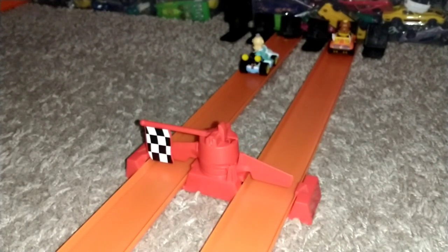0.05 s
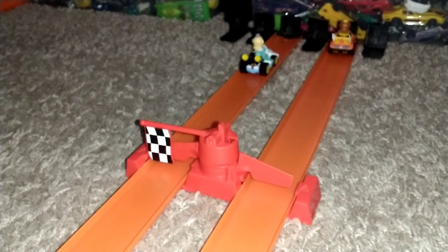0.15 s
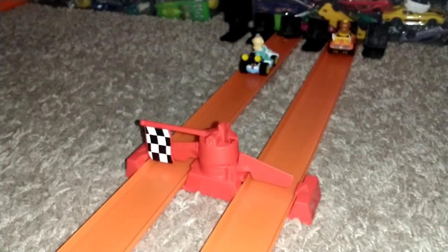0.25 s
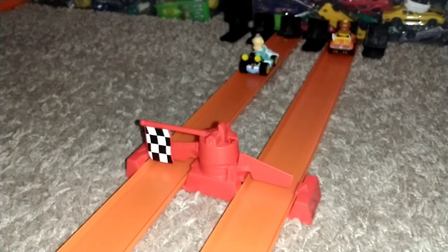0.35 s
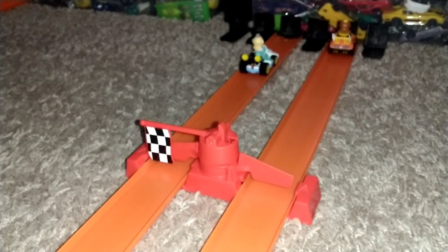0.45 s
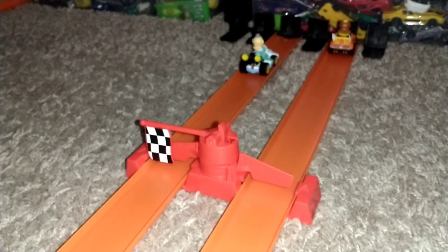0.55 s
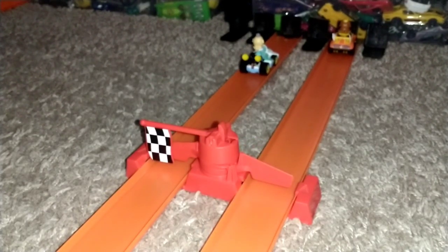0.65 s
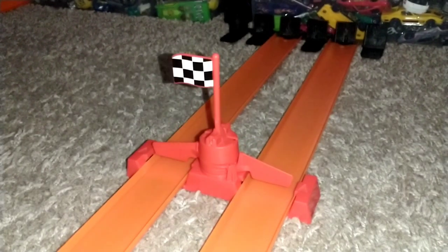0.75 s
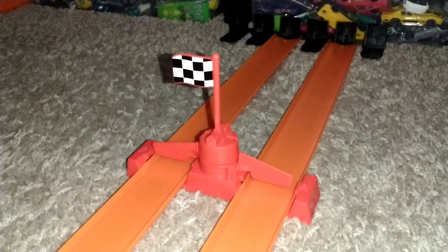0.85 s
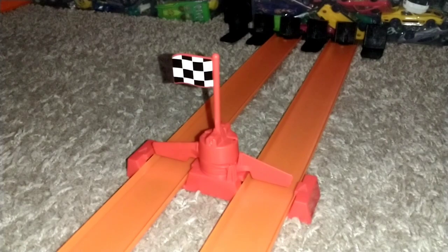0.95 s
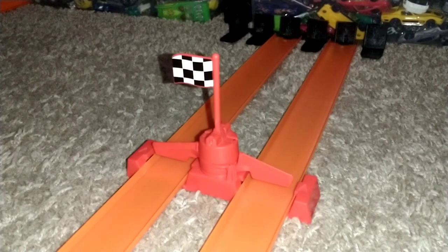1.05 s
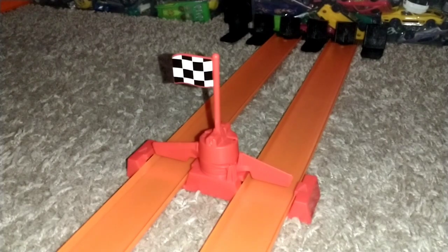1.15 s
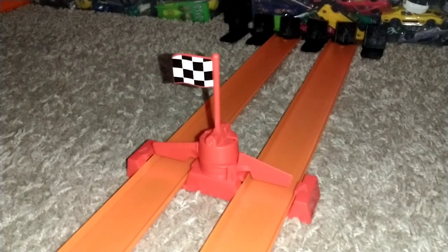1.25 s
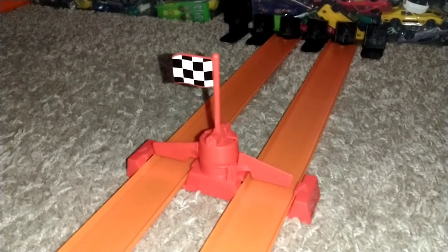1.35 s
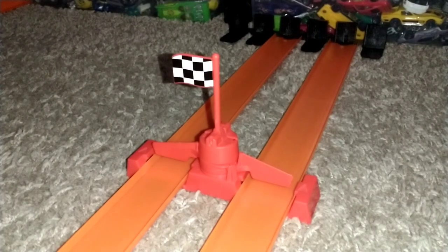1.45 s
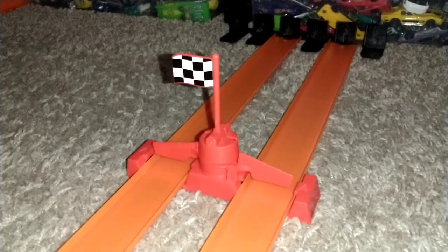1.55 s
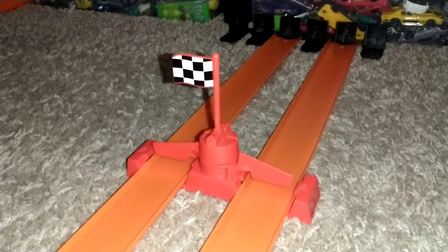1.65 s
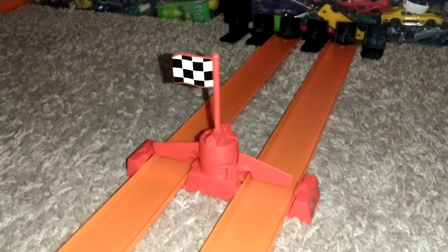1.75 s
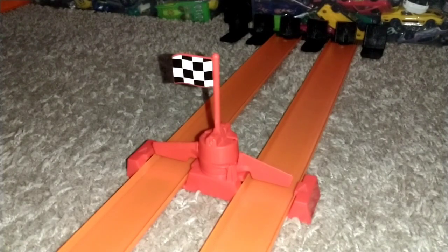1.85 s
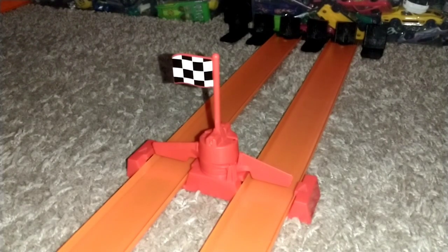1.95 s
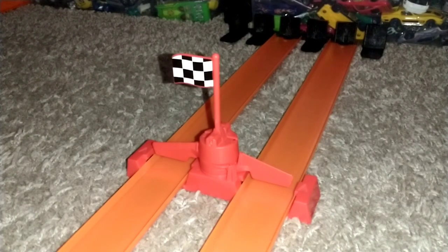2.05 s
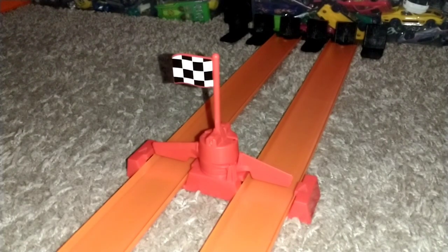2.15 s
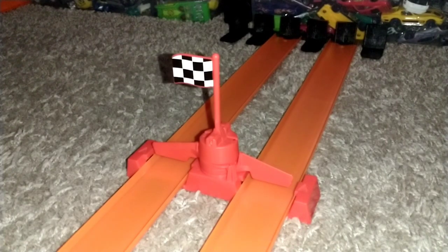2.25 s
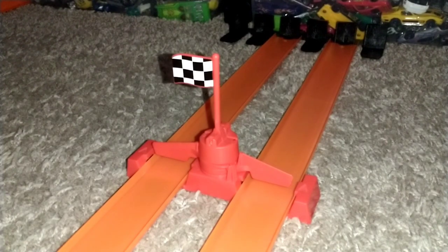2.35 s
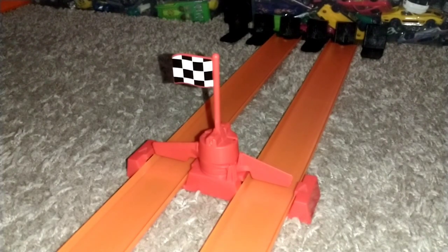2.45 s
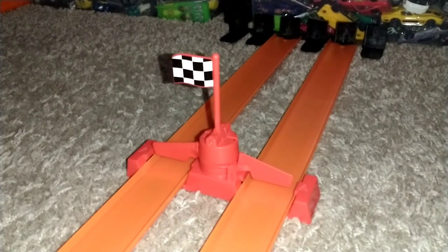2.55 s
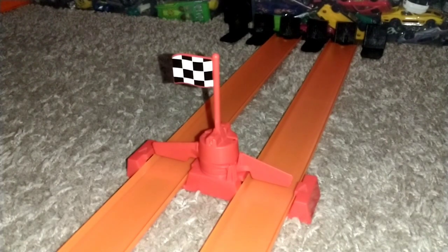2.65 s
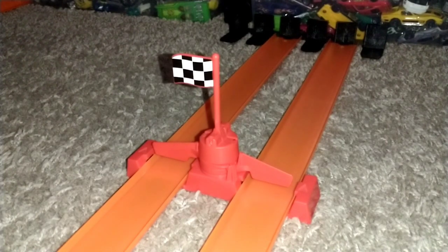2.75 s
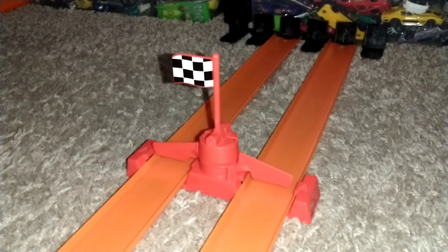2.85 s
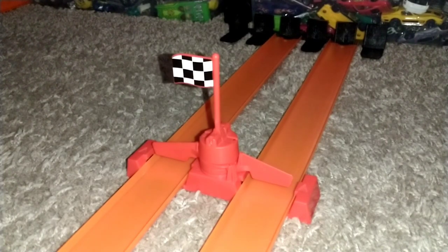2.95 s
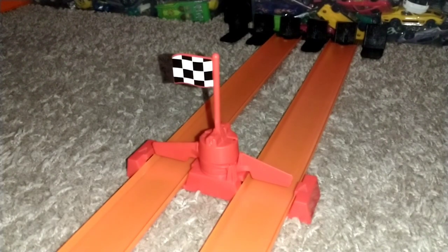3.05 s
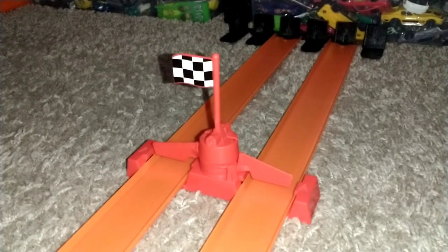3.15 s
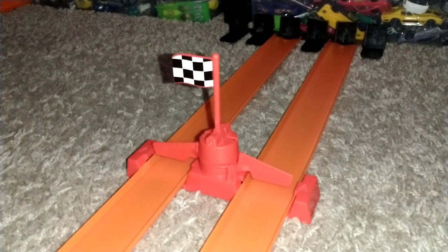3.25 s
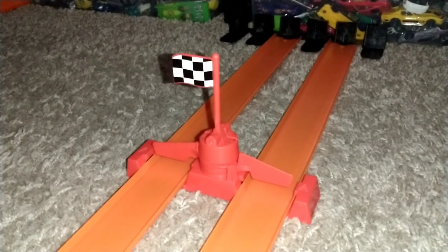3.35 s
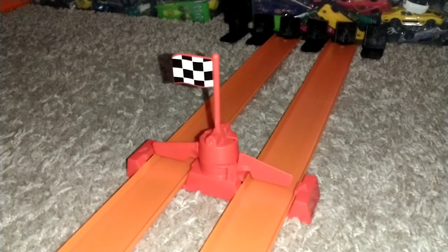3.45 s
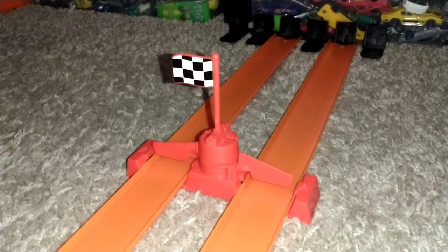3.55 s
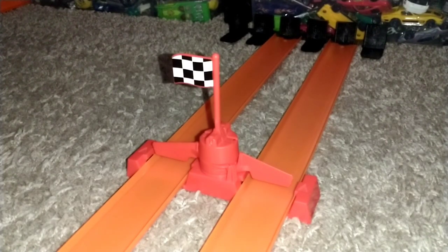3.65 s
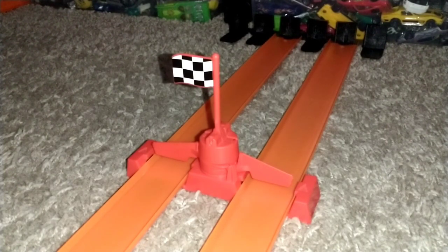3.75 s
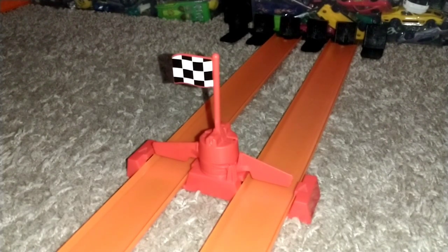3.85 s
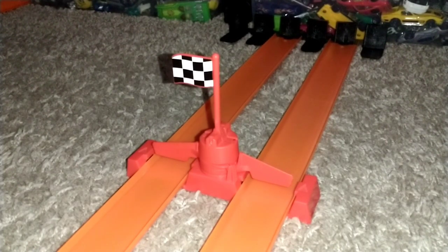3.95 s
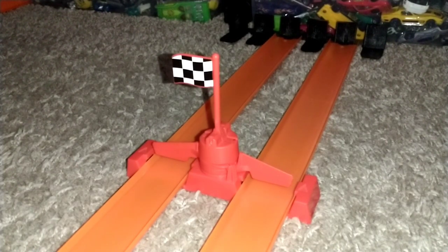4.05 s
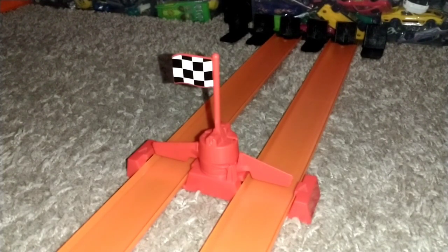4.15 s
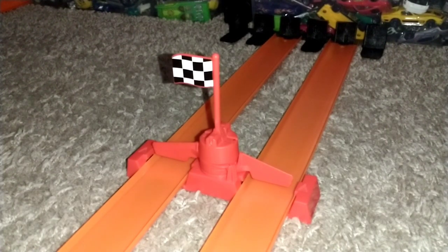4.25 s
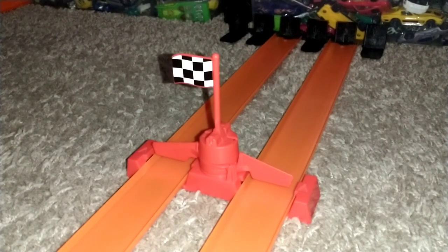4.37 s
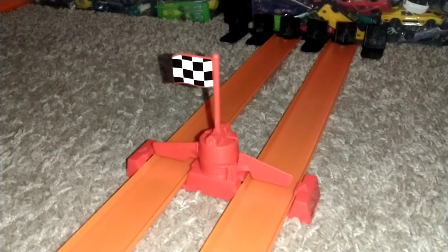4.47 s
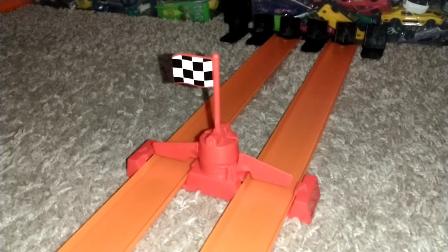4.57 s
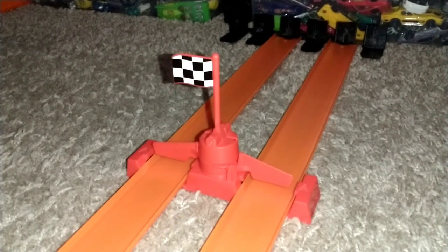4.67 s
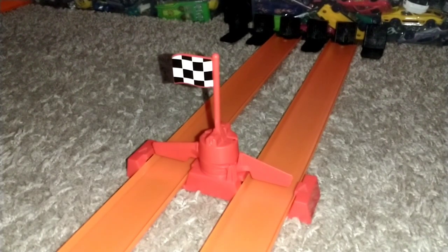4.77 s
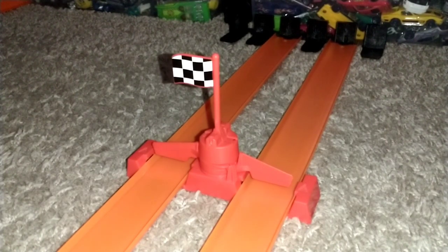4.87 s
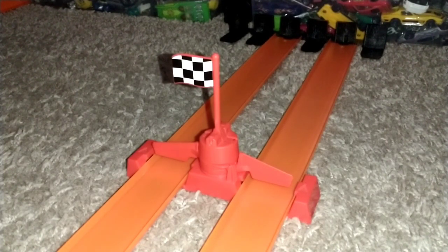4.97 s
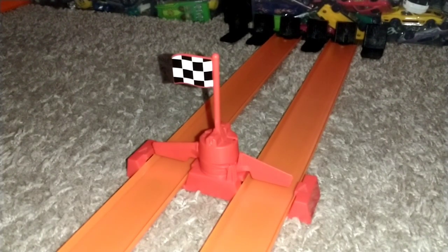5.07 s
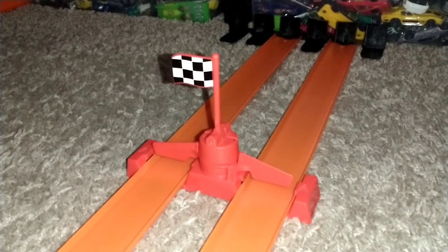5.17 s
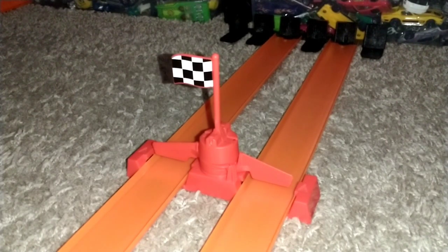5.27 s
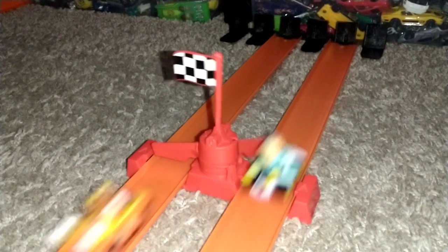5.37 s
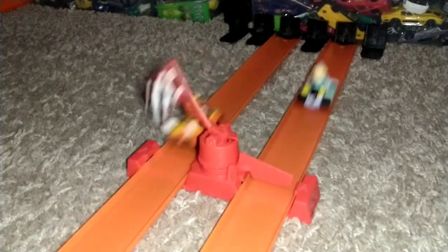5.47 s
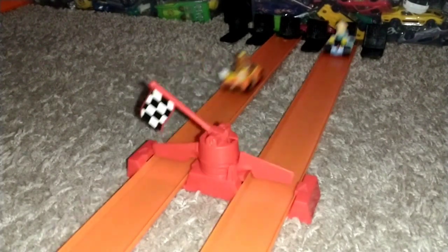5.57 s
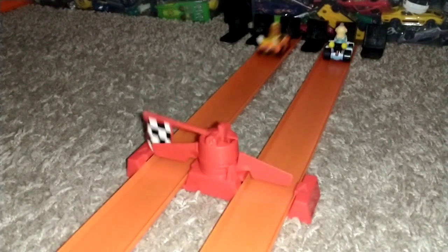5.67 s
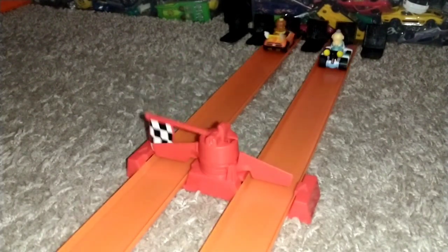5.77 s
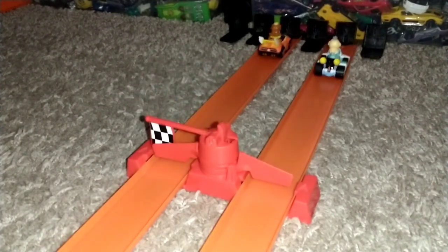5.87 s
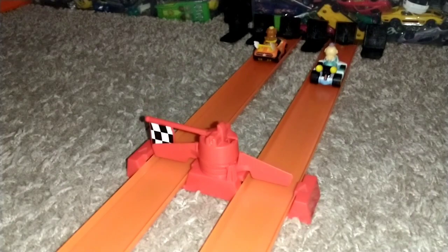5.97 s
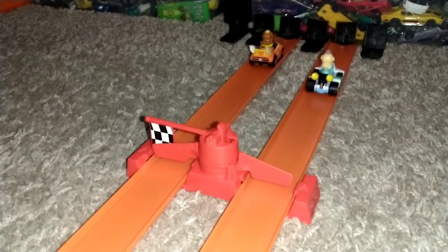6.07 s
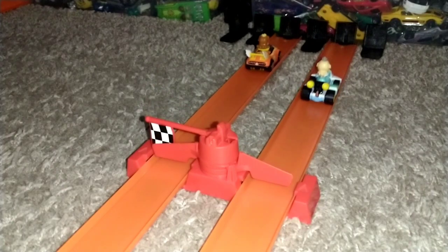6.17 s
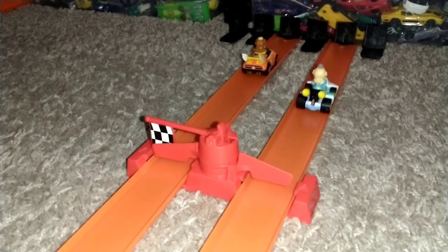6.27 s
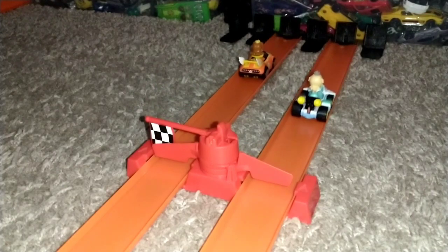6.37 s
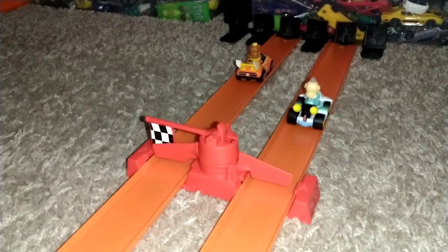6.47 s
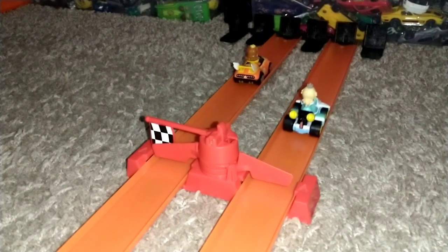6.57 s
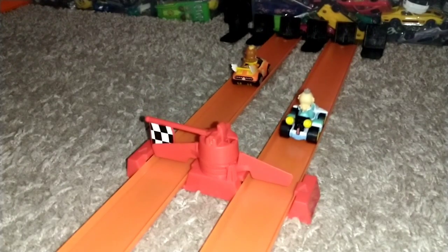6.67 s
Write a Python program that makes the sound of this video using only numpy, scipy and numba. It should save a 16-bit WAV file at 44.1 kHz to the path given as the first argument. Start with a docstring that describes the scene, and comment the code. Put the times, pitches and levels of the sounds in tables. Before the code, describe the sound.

A small carpeted room, heard by a stereo pair near the foot of a plastic toy track. Very faint air and low hum, dropping to complete silence from about 0.7 to 1.0 s. At 1.9 s a distant start gate clicks in a quick flurry, and two toy cars begin rolling; stronger joint clicks follow at 2.3 to 2.5 s. Hard wheels chatter as a bright, grainy rattle, fullest from 2.5 to 3.5 s, with faint low drumming of the hollow span. The rattle thins around 4 to 4.7 s, then swells nearer. From 5.17 s sharp, loud clacks strike close by, leaning left at first, crowding at 5.36 to 5.44 s and again near 5.55 s, with hollow plastic knocks. A last heavy knock lands at 5.71 s. Rolling stops at 5.78 s; two dull taps and a barely audible creep fade into room hum.

```python
"""A carpeted room, a stereo pair near the foot of a toy track: air and hum, then a brief dropout.
Far off, a start gate clicks open and two toy cars rattle down the hollow ramp, through the dip and
along the flat towards the microphones: random wheel blows, coloured by each stretch, over a drumming span.
Near by, bursts of noise clack at the joints, finish gate and stop, and heavy blows ring the plastic's modes.
One car is caught, then the other; the rattle drops to a faint creep back and dies away."""
import sys
import numpy as np
from scipy import signal
from scipy.fft import rfft, irfft
from scipy.io import wavfile
from numba import njit

SR = 44100
rng = np.random.default_rng(int(sys.argv[2]) if len(sys.argv) > 2 else 0)


def master_out(mix):
    """Clip the mix to full scale and print it as 16-bit PCM to the path in sys.argv[1]."""
    frames = np.transpose(np.atleast_2d(mix))
    ceiling = np.clip(frames, -1, 1)
    pcm = np.round(ceiling * 32767).astype(np.int16)
    wavfile.write(sys.argv[1], SR, pcm)


N = 296307
T = np.arange(N) / SR
FREQS = np.fft.rfftfreq(2 * N, 1 / SR)

# still room, colour of the air: f/Hz, relative level/dB
AIR_COLOUR = [(18, -65), (30, -41.5), (64, -12), (171, -13), (205, -8), (320, -14), (355, -8), (394, -13.5),
              (524, -11.5), (581, -23), (794, -16), (1340, -23.5), (1560, -22), (2430, -28), (15000, -39)]
AIR_DB, AIR_WAVER_DB = -68.5, 0.34
# wavering hum bands: f/Hz, width of each of two filter passes/Hz, level/dB
HUM_BANDS = [(204.7, 17, -76), (365, 60, -83), (552, 57, -80), (1570, 220, -90), (2150, 250, -92.5)]
HUM_TONE_HZ, HUM_TONE_DB = 210, -77
# dropout before the start: from t/s, to t/s
DROPOUT = (.678, 1)

# far off, start gate and first joints: t/s, relative level/dB
FAR_CLICKS = [(1.9135, -39), (1.986, -33), (2.004, -35), (2.03, -34), (2.045, -30), (2.058, -21.5),
              (2.318, -14), (2.36, -22.5), (2.465, -14.5)]
CLICK_CONTACT_S, CLICK_DULL_HZ, CLICK_PAN_DB = .006, 6000, 3
# near by, last joints, finish gate and stop: t/s, relative level/dB, left minus right/dB
NEAR_CLACKS = [(5.173, -14, 2.5), (5.2535, -6, 7), (5.3629, -2.5, 2.5), (5.3755, -6, -1.5),
               (5.421, -7.5, -.5), (5.425, -4.5, -5.5), (5.4423, -7.5, -5.5), (5.536, -8.5, -2.5),
               (5.586, -4.5, -2.5), (5.591, -10.5, 8.5), (5.6527, -21.5, -4.5), (5.7132, -5, -1.5),
               (5.741, -20, 6), (5.7583, -21, 1.5)]
CLACK_CONTACT_S, CLACK_DULL_HZ = 0.0028, 11200
# a car rocks back on to its wheels: t/s, relative level/dB
WHEEL_TAPS = [(5.841, -23), (5.881, -27.5)]
TAP_CONTACT_S, TAP_DULL_HZ = 0.0035, 930
# colour of all these impacts: f/Hz, relative level/dB
IMPACT_COLOUR = [(240, -49.5), (400, -24.5), (2220, -7), (2840, -7.5), (4770, -2), (7550, 0.5), (10700, -6),
                 (11900, -11.5), (14600, -10), (15500, -20.5)]

# wheels as heard at the microphones: t/s, relative level/dB
WHEEL_LEVEL = [(1.93, -49.5), (1.96, -54), (2.07, -37), (2.1, -42), (2.33, -29), (2.46, -28), (2.47, -24.5),
               (2.7, -22), (2.73, -25.5), (3.02, -23), (3.22, -26), (3.27, -23.5), (3.53, -34.5),
               (3.55, -29.5), (3.75, -26.5), (3.99, -32.5), (4.03, -38.5), (4.74, -41), (5.26, -23),
               (5.33, -25.5)]
# where the cars are: t/s, left minus right/dB
CAR_BEARING = [(2.0, 0), (2.7, 2), (3.6, -1), (4.4, -1), (4.9, 0.5), (5.25, 6.5), (5.5, -2), (5.9, -2.5)]
# colour of each stretch of track, in order of travel: f/Hz, relative level/dB
TOP_COLOUR = [(150, -23), (400, -10.5), (900, -12), (1800, -2), (3500, -1.5), (7000, -11), (10000, -19),
              (15000, -35)]
RAMP_COLOUR = [(180, -46), (300, -18), (500, -20), (950, -17.5), (1300, -11.5), (1750, -9.5), (2800, -7.5),
               (5100, -5.5), (8000, -11), (11500, -23.5), (15000, -30.5)]
SLOPE_COLOUR = [(180, -32), (300, -18), (480, -19), (750, -11), (1350, -16), (2250, -7), (3500, -5),
                (5900, -3), (8200, -6), (11500, -19), (15000, -23.5)]
DIP_COLOUR = [(180, -47), (300, -13), (460, -19), (640, -6), (1000, -6.5), (1400, -8), (2100, -7),
              (3000, -4.5), (5400, -5), (8200, -7), (11500, -16.5), (15000, -24)]
FOOT_COLOUR = [(180, -29), (300, -19), (460, -12), (750, -4), (1400, -12.5), (2100, -5.5), (3100, -3.5),
               (4800, -6), (7600, -7.5), (11200, -15.5), (13000, -13), (15000, -19)]
FLAT_COLOUR = [(180, -35.5), (300, -17.5), (460, -19.5), (700, -12), (1350, -12), (2100, -5.5), (3100, -4),
               (4800, -7), (7400, -0.5), (11200, -12), (12700, -8.5), (15000, -17)]
APPROACH_COLOUR = [(180, -44), (300, -32), (460, -29), (750, -19.5), (1600, -15.5), (2200, -9.5),
                   (3150, -7), (4100, -9), (6700, -6), (9800, -16), (15000, -20.5)]
RUNOUT_COLOUR = [(180, -43.5), (350, -17), (650, -11.5), (1100, -9.5), (1900, -5.5), (3300, -2), (4600, -4),
                 (7300, -5), (15000, -17.5)]
# stretches: middle of entry t/s, handover/s, ring f/Hz, ring width/Hz, ring level/dB,
# right lags left/ms, room over direct/dB, spread of blow sizes/dB
TRACK_STRETCHES = [(1.8, .05, 3620, 400, -7, .42, 6.5, 7.5), (2.14, 0.16, 2210, 130, 1.5, 0.44, 5, 3.5),
                   (2.83, 0.23, 2250, 200, -12, 0.4, 10.5, 4), (3.532, 0.0096, 1020, 200, -12, .4, 8.5, 1),
                   (4.005, 0.027, 3134, 400, 4, 0.29, 13, 2.5), (4.35, 0.38, 3113, 403, -4, 0.26, 10, 2.5),
                   (5.0, 0.27, 3167, 500, -1, 0.31, 3, 3.5), (5.37, 0.12, 2170, 300, -13, -0.12, 3.5, 4.5)]
# past the finish gate the cars coast; one is caught, then the other; a faint creep back follows
GATE_S, COAST_DB, COAST_FADE_DB_PER_S = 5.304, -26, 6
CAUGHT_S, CAUGHT_DROP_DB, CAUGHT_SLOWING_S = 5.58, 5.5, .08
STOP_S, STOP_FADE_DB_PER_S = 5.775, 892
CREEP_DB, CREEP_FADE_DB_PER_S = -63, 22.5

# flexing track under the cars: t/s, relative level/dB
SPAN_LEVEL = [(1.92, -58.5), (2.89, -46), (3.23, -50), (3.27, -42.5), (3.35, -43.5), (3.4, -53),
              (3.53, -51), (3.57, -47), (4.31, -64), (4.37, -51), (4.69, -64.5), (5.29, -61), (5.3, -58)]
# the raised span rings higher while the cars are on its stiff lower part
SPAN_SLACK_HZ, SPAN_STIFF_HZ = 144, 300
STIFF_FROM_S, STIFF_TO_S, STIFFEN_S = 2.62, 4.1, .3

# blows heavy enough to shake the hollow plastic: t/s, relative level/dB, push/s
HEAVY_BLOWS = [(5.363, -33, 0.00025), (5.4225, -35, .0003), (5.536, -29, .0003), (5.5858, -18.5, .0003),
               (5.5874, -14.5, 0.00037), (5.7132, -9.5, 0.00058)]
# modes of the hollow plastic: f/Hz, relative level/dB, t60/s
BODY_MODES = [(200, -21, 0.052), (467, -14.5, 0.088), (568, -0.5, 0.048), (650, -3.5, .035),
              (747, -4.5, 0.023), (830, -6, 0.031), (1009, -8, .03), (1253, -1.5, 0.045),
              (1830, -20.5, .05), (2550, -17, .03)]

# likeness of the two microphones in a diffuse field: f/Hz, correlation
MIC_LIKENESS = [(60, 1), (170, 0.73), (300, .7), (450, 0.35), (650, .55), (1200, -0.27), (2000, 0.24),
                (3500, 0.082)]
# the microphones' colours differ: f/Hz, left minus right/dB
MIC_DIFFERENCE = [(300, 0), (2000, -.5), (5500, 4.5), (8500, -1), (13000, -0.5)]
ROOM_T60_S, TOP_HZ = 0.32, 15600
CEILING = .85  # peaks are rounded towards this amplitude


def undb(db):
    """Decibels to gain."""
    return 10 ** (np.asarray(db) / 20)


def unit(x):
    """Scale to rms 1."""
    return x / np.sqrt(np.mean(x ** 2))


def curves(table):
    """The columns of a table, joined by straight lines in time."""
    s, *columns = np.transpose(table)
    return [np.interp(T, s, column) for column in columns]


def along(points, hz):
    """Read (f/Hz, value) points on a log-frequency axis."""
    f, value = np.transpose(points)
    return np.interp(np.log(hz + 1), np.log(f), value)


def pan(db):
    """Left and right gains for a level difference."""
    return undb(np.array([[.5], [-.5]]) * db)


def convolve(x, response):
    """Play sound through a response."""
    return signal.fftconvolve(np.atleast_2d(x), np.atleast_2d(response), axes=1)[:, :N]


def colour(x, points, size=2048):
    """Minimum-phase filter of unit energy, shaped to the given spectrum by folding its cepstrum."""
    gain = undb(along(points, np.fft.rfftfreq(size, 1 / SR)))
    cepstrum = irfft(np.log(gain))
    cepstrum[1:size // 2] *= 2
    cepstrum[size // 2 + 1:] = 0
    response = irfft(np.exp(rfft(cepstrum)))
    return convolve(x, response / np.linalg.norm(response))


@njit
def svf(x, hz, width):
    """State-variable band-pass with moving centre and width, gain 1 at the centre."""
    y, band, low = np.empty(len(x)), 0., 0.
    for i in range(len(x)):
        g = np.tan(np.pi * hz[i] / SR)
        damping = width[i] / hz[i]
        v = (band + g * (x[i] - low)) / (1 + g * (g + damping))
        band = 2 * v - band
        low = low + 2 * g * v
        y[i] = damping * v
    return y


def resonate(x, hz, width):
    """One resonance, fixed or moving."""
    return svf(x, hz * np.ones(N), width * np.ones(N))


def resonate_twice(x, hz, width):
    """Two equal resonances in series, for steeper skirts."""
    return resonate(resonate(x, hz, width), hz, width)


def diffuse(size):
    """Stereo noise from all sides: alike in the bass, nearly unrelated in the high treble."""
    mid, side = rfft(rng.standard_normal((2, size)))
    alike = np.clip(along(MIC_LIKENESS, np.fft.rfftfreq(size, 1 / SR)), -1, 1)
    common = mid * np.sqrt(1 + alike)
    opposed = np.array([[1], [-1]]) * side * np.sqrt(1 - alike)
    return unit(irfft(common + opposed, size))


def wobble(rate):
    """Smooth random motion with rms 1, through `rate` random points a second."""
    knots = rng.standard_normal(4096)
    return unit(np.interp(T * rate, np.arange(len(knots)), knots))


def room(early_s=0.0058, early_db=4, size=16384):
    """Reflections from one place: scatter from nearby toys and floor, then the room's tail."""
    t = T[:size]
    early = np.exp(-t / early_s)
    late = undb(-60 * t / ROOM_T60_S) * (1 - np.exp(-t / 0.0065))
    return diffuse(size) * unit(undb(early_db) * early + late) / np.sqrt(size)


def moving_room(x, count=12):
    """The pattern of reflections changes as the cars move: randomly weighted responses, constant power."""
    weights = np.array([wobble(40) for _ in range(count)])
    weights /= np.sqrt(np.sum(weights ** 2, axis=0))
    return sum(weight * convolve(x, room()) for weight in weights)


def still_room():
    """Soft air noise from all sides and a hum: one steady tone among wavering bands."""
    hum = 0
    for hz, width, db in HUM_BANDS:
        hum = hum + undb(db) * unit(resonate_twice(rng.standard_normal(N), hz, width))
    tone = undb(HUM_TONE_DB) * unit(np.sin(2 * np.pi * HUM_TONE_HZ * T))
    air = unit(colour(diffuse(N), AIR_COLOUR)) * undb(AIR_DB + AIR_WAVER_DB * wobble(9))
    return air + hum + tone


def clacks(gain_db=-6, ring_s=.007, ring_db=-13, tail_db=-13):
    """A few milliseconds of hard contact, a short ring of the plastic, then the room."""
    blows = [(s, db, CLICK_PAN_DB, CLICK_CONTACT_S, CLICK_DULL_HZ) for s, db in FAR_CLICKS]
    blows += [(s, db, pan_db, CLACK_CONTACT_S, CLACK_DULL_HZ) for s, db, pan_db in NEAR_CLACKS]
    blows += [(s, db, 0, TAP_CONTACT_S, TAP_DULL_HZ) for s, db in WHEEL_TAPS]
    out = np.zeros((2, N))
    for s, db, pan_db, contact_s, dull_hz in blows:
        # a one-pole low-pass dulls the burst
        pole = np.exp(-2 * np.pi * dull_hz / SR)
        burst = signal.lfilter([1 - pole], [1, -pole], diffuse(size=4096))
        t, start = T[:burst.shape[1]], int(s * SR)
        envelope = np.exp(-(t / contact_s) ** 4) + undb(ring_db) * np.exp(-t / ring_s)
        out[:, start:start + len(t)] += burst * envelope * undb(db + gain_db) * pan(pan_db)
    out = colour(out, IMPACT_COLOUR)
    return out + undb(tail_db) * convolve(out, room())


def contacts(rate, spread_db, chatter_db):
    """Tiny blows of hard wheels and loose axles, `rate` a second, swelling as the cars chatter."""
    hit = rng.random(N) < rate / SR
    size = undb(spread_db * np.minimum(rng.exponential(size=N), 5))
    sign = rng.choice([-1, 1], N)
    return unit(hit * size * sign * undb(chatter_db * wobble(110)))


def stopped_s():
    """Time since the cars reached the stop."""
    return np.maximum(T - STOP_S, 0)


def rattle_db():
    """Level of the wheels: the run down the track, a fading coast, the stop and a slow creep back."""
    (run_db,) = curves(WHEEL_LEVEL)
    caught = np.clip((T - CAUGHT_S) / CAUGHT_SLOWING_S, 0, 1)
    coast_db = COAST_DB - COAST_FADE_DB_PER_S * (T - GATE_S) - CAUGHT_DROP_DB * caught
    moving_db = np.where(T < GATE_S, run_db, coast_db)
    stopping_db = moving_db - STOP_FADE_DB_PER_S * stopped_s()
    creep_db = CREEP_DB - CREEP_FADE_DB_PER_S * stopped_s()
    return np.maximum(stopping_db, creep_db)


def rolling(gain_db=2):
    """Each stretch of track colours the wheel blows and rings in its own way."""
    level_db, (pan_db,) = rattle_db(), curves(CAR_BEARING)
    colours = [TOP_COLOUR, RAMP_COLOUR, SLOPE_COLOUR, DIP_COLOUR,
               FOOT_COLOUR, FLAT_COLOUR, APPROACH_COLOUR, RUNOUT_COLOUR]
    entered = [np.clip((T - row[0]) / row[1] + .5, 0, 1) for row in TRACK_STRETCHES] + [0]
    direct, scattered = 0, 0
    for k, spectrum in enumerate(colours):
        _, _, hz, width, ring_db, lag_ms, wet_db, spread_db = TRACK_STRETCHES[k]
        blows = contacts(rate=3500, spread_db=spread_db, chatter_db=1.52)
        ringing = blows + undb(ring_db) * resonate(blows, hz, width)
        strip = unit(colour(ringing, spectrum))[0]
        # equal-power handover between stretches; direct and room sound share the power
        share = np.clip(entered[k] - entered[k + 1], 0, 1)
        strip = strip * np.sqrt(share / (1 + undb(wet_db) ** 2))
        # the direct sound reaches one microphone first; the rest comes by way of the room
        lag = int(round(lag_ms * SR / 1000))
        direct = direct + np.array([strip, np.roll(strip, lag)])
        scattered = scattered + undb(wet_db) * strip
    return (direct + moving_room(scattered)) * undb(level_db + gain_db) * pan(pan_db)


def drumming(gain_db=-1, broad_db=-5, span_share=0.79, release_db_per_s=150):
    """Wheels drum on the unsupported span; its note climbs on the stiff part and then falls back."""
    level_db = curves(SPAN_LEVEL)[0] - release_db_per_s * stopped_s()
    stiff = np.clip(np.minimum(T - STIFF_FROM_S, STIFF_TO_S - T) / STIFFEN_S, 0, 1)
    hz = SPAN_SLACK_HZ + (SPAN_STIFF_HZ - SPAN_SLACK_HZ) * stiff
    blows = contacts(rate=690, spread_db=3.0, chatter_db=-0.5)
    span = unit(resonate_twice(blows, hz, span_share * hz))
    frame = unit(resonate_twice(blows, 180, 270))
    drum = unit(moving_room(span + undb(broad_db) * frame, count=4))
    return drum * undb(level_db + gain_db)


def knocks(tail_db=-16, low_hz=200):
    """The weight of a car pushes the hollow plastic into its low modes; so small a body radiates no deep bass."""
    push = 0
    for s, db, push_s in HEAVY_BLOWS:
        push = push + undb(db) * np.exp(-8 * ((T - s) / push_s) ** 2) / (push_s * SR)
    t = T[:SR // 4]
    ring = sum(undb(db - 60 * t / t60) * np.cos(2 * np.pi * hz * t) for hz, db, t60 in BODY_MODES)
    bass_cut = signal.butter(2, low_hz, "high", fs=SR, output="sos")
    body = signal.sosfilt(bass_cut, convolve(push, ring))
    return body + undb(tail_db) * convolve(body, room())


def scene():
    """The room throughout; the cars from the opening of the gate until the creep back fades."""
    released = np.clip((T - 1.914) / 0.0012, 0, 1)
    cars = (rolling() + drumming()) * released
    return still_room() + clacks() + cars + knocks()


def record(dry):
    """Two unlike microphones, a short silence, rounded peaks and a steep top cut."""
    heard = irfft(rfft(dry, 2 * N) * pan(along(MIC_DIFFERENCE, FREQS)))[:, :N]
    live = np.clip(np.maximum(DROPOUT[0] - T, T - DROPOUT[1]) / .003 + 1, 0, 1)
    rounded = CEILING * np.tanh(heard * live / CEILING)
    top_cut = signal.ellip(10, .1, 60, TOP_HZ, fs=SR, output="sos")
    return signal.sosfiltfilt(top_cut, rounded)


dry = scene()
out = record(dry)
master_out(out)
```